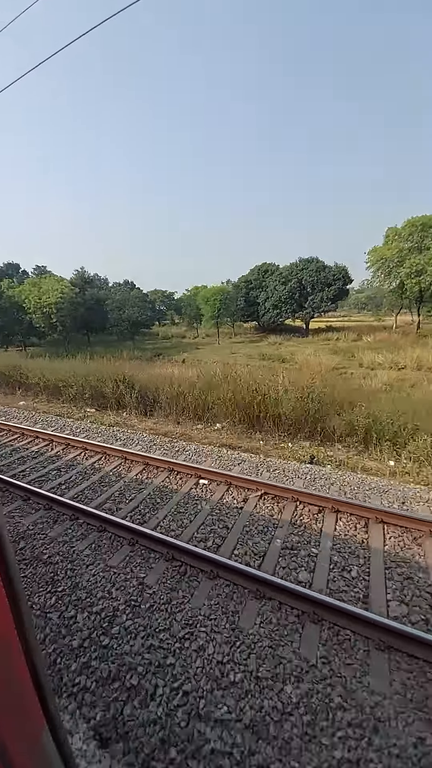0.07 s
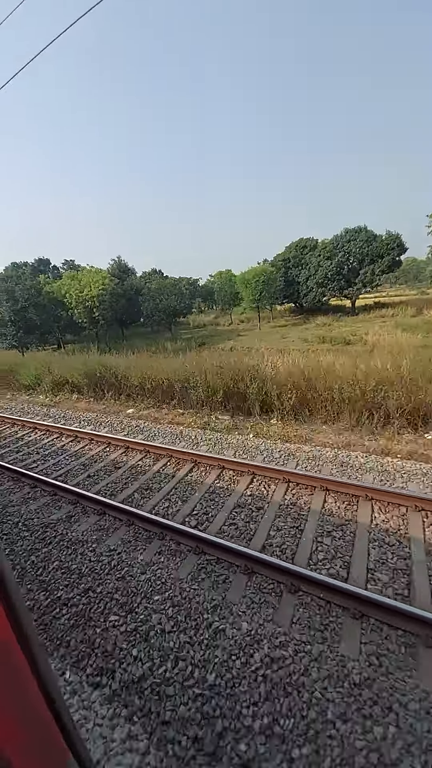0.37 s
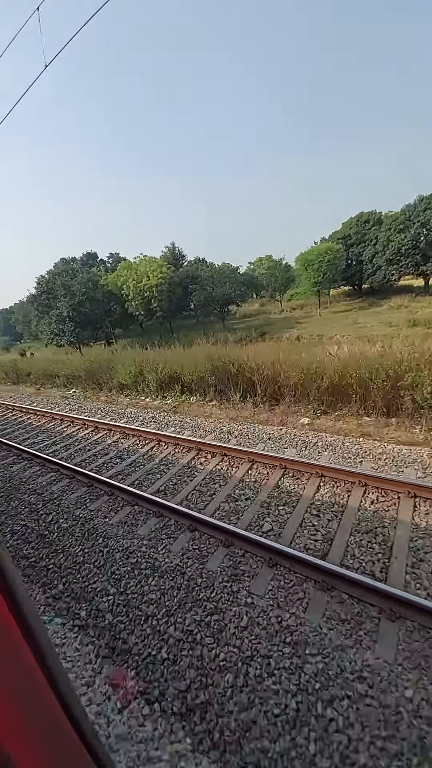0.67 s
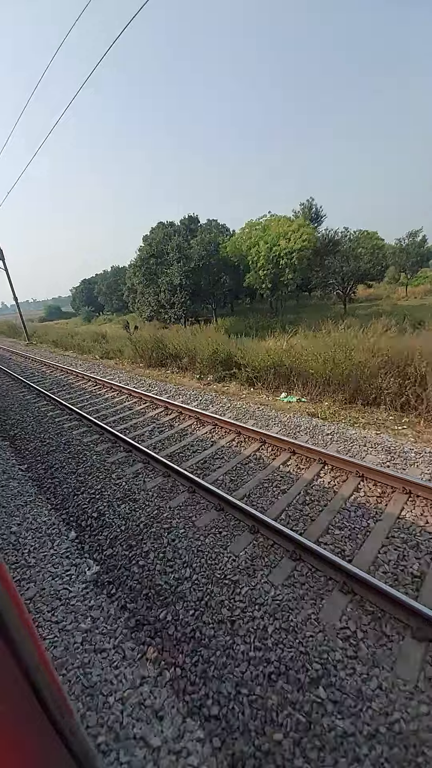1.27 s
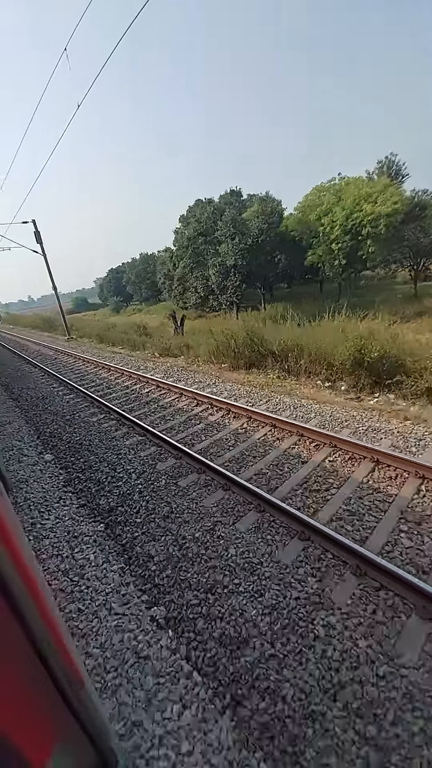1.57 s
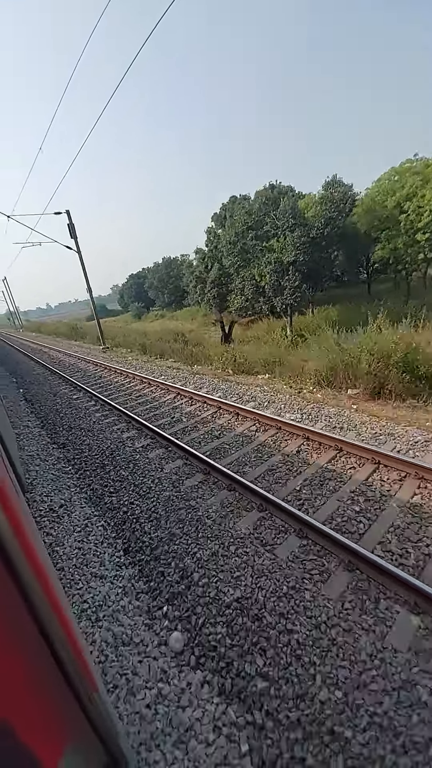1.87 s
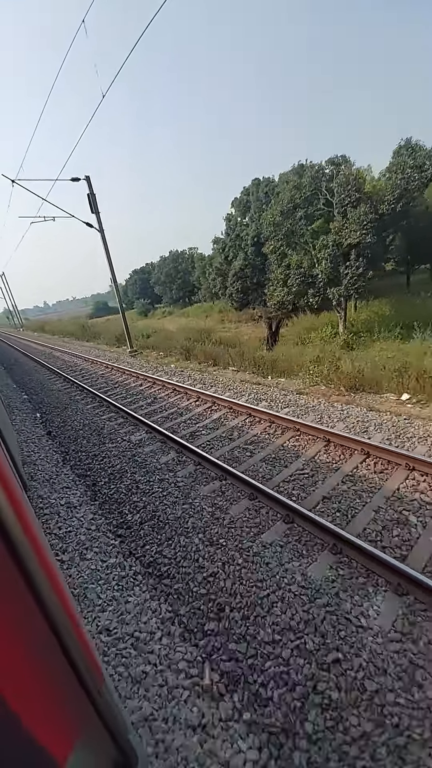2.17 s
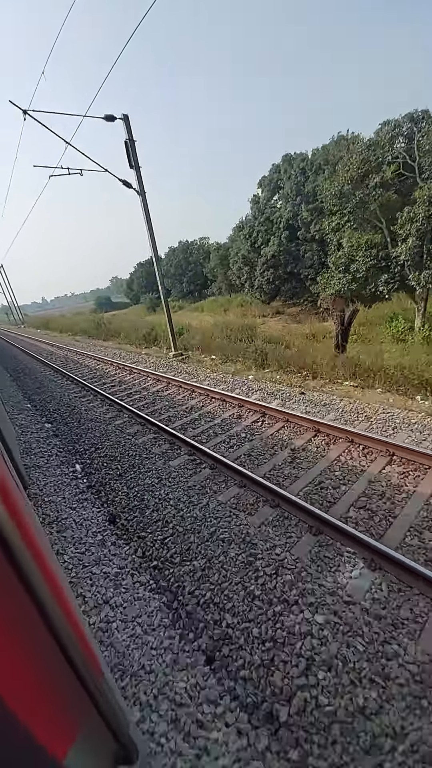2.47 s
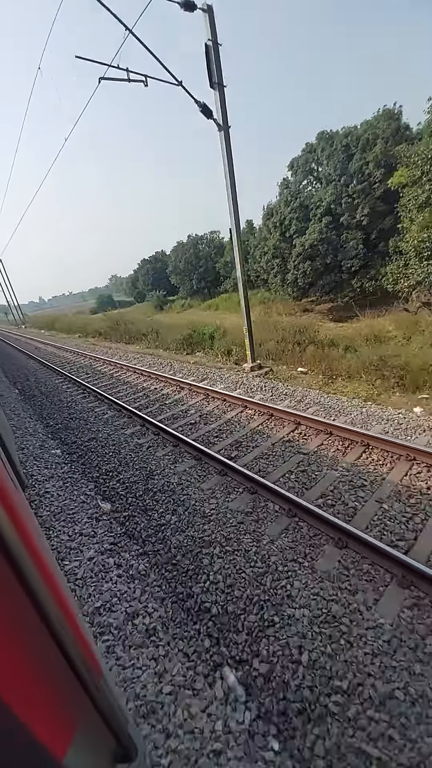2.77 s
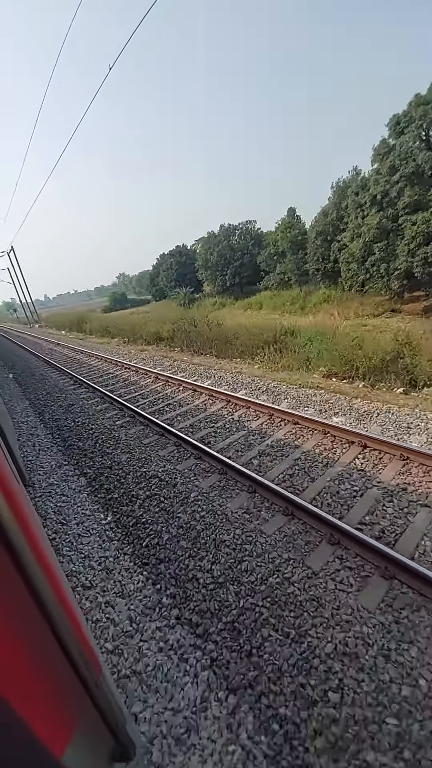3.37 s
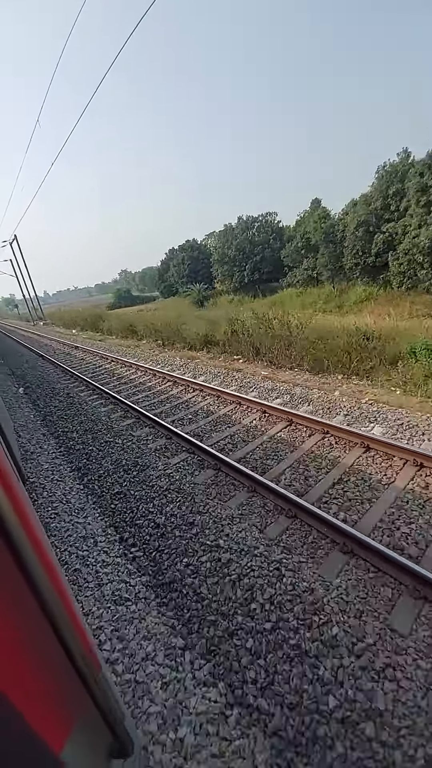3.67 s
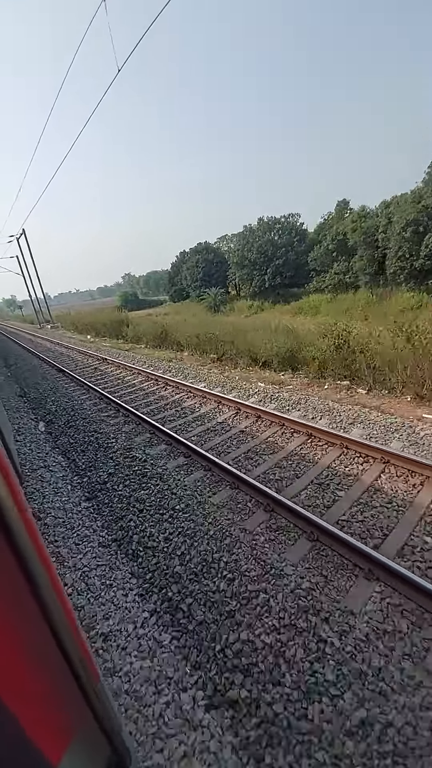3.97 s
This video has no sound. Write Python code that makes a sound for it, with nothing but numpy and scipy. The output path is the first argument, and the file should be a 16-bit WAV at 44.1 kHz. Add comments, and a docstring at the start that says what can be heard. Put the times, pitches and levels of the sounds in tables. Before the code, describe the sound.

Ragged gusts thump and crackle on the microphone as a train rolls along.

```python
"""Fast train from an open doorway

Wheels roll on the rails with a steady roar and faint ringing. The slipstream hits the two microphone
ports: a lumpy rumble, deep thumps, and a run of ragged buffets that grow brighter and crackle as the
microphone turns into the wind."""
import sys
import numpy as np
from scipy import signal
from scipy.io import wavfile
from scipy.ndimage import uniform_filter1d

SR = 44100
rng = np.random.default_rng(int(sys.argv[2]) if len(sys.argv) > 2 else 0)


def unload_wav(signal):
    """Save mono or channel-first audio to the path in sys.argv[1] as 16-bit WAV at rate SR, clipped to [-1, 1]."""
    wavfile.write(
        sys.argv[1],
        SR,
        np.round(np.clip(np.atleast_2d(signal).T, -1, 1) * 32767).astype(np.int16),
    )


N = 176400
T = np.arange(N) / SR

# how alike the low wind is on the two ports: t/s, correlation/0-1
LOW_WIND_LIKENESS = [(0, 0.84), (.75, 1), (.95, 0), (4, 0)]


def from_db(db):
    """Decibels to gain."""
    return 10 ** (np.asarray(db) / 20)


def rms_one(x):
    """Scale to unit power."""
    return x / np.sqrt(np.mean(x ** 2) + 1e-20)


def evened(x, samples):
    """Hold the power of a noise at 1 over a sliding window."""
    return x / np.sqrt(np.abs(uniform_filter1d(x ** 2, samples, axis=-1)) + 1e-20)


def in_time(rows):
    """Breakpoints to automation curves, one per column after the time."""
    times, *columns = np.transpose(rows)
    return np.array([np.interp(T, times, column) for column in columns])


def around(middle):
    """The samples near an event."""
    return slice(max(int((middle - .07) * SR), 0), min(int((middle + .11) * SR), N))


def panned(db):
    """Left and right gains at unit mean power; positive dB leans left."""
    return rms_one(from_db(np.array([[db], [-db]]) / 2))


def alike(pair, likeness):
    """Blend two unrelated noises into a left and right of the given correlation."""
    likeness = np.clip(likeness, 0, 1)
    mid = np.sqrt(1 + likeness) * pair[0]
    side = np.sqrt(1 - likeness) * pair[1]
    return np.vstack([mid + side, mid - side]) / np.sqrt(2)


def drift(hz):
    """Two unrelated smooth random modulators; rms 1."""
    step, settle = 20, 2000
    pole = np.exp(-2 * np.pi * hz * step / SR)
    white = rng.standard_normal((2, N // step + settle + 2))
    slow = signal.lfilter([1], [1, -2 * pole, pole * pole], white)[:, settle:]
    return np.array([np.interp(np.arange(N) / step, np.arange(len(v)), rms_one(v)) for v in slow])


def burst(t, middle, length):
    """Envelope with a quick attack, sagging hold and exponential release."""
    attack_s, release_s, sag_db = 0.002, 0.0062, 1.9
    early = np.maximum(middle - length / 2 + attack_s - t, 0)
    late = np.maximum(t - middle - length / 2 + release_s / 2, 0)
    sag = from_db(-sag_db * np.clip((t - middle) / length, -.5, .5))
    return sag * np.exp(-(early / attack_s) ** 2 - late / release_s)


def cut(x, hz, kind):
    """Gentle high-, low- or band-pass."""
    return signal.sosfilt(signal.butter(2, hz, kind, fs=SR, output="sos"), x)


def resonator(hz, q):
    """Coefficients of a resonant low-pass."""
    w = 2 * np.pi * hz / SR
    damping = np.sin(w) / (2 * q)
    return (1 - np.cos(w)) / 2 * np.array([1, 2, 1]), [1 + damping, -2 * np.cos(w), 1 - damping]


def hump(x, hz, q, low_share, top_share=4.16):
    """Gather air noise near one frequency, with band edges at multiples of it; rms 1."""
    x = signal.lfilter(*resonator(hz, q), cut(x, hz * low_share, "high"))
    return rms_one(cut(x, min(hz * top_share, SR / 3), "low"))


def banded_noise(spectrum):
    """Stereo noise coloured by a bank of band-passes; rms 1."""
    edges_hz = np.geomspace(18, 17000, 25)
    hz, db = np.transpose(spectrum)
    white, out = rng.standard_normal((2, 2, N)), 0
    for k, band in enumerate(zip(edges_hz, edges_hz[1:])):
        gain = from_db(np.interp(np.mean(np.log(band)), np.log(hz), db))
        out = out + gain * cut(white[k % 2], band, "band")
    return rms_one(out)


def ported(x):
    """The microphone ports ring hollowly and swallow one band."""
    # port peaks and dip: f/Hz, width/Hz, share added or taken away
    bands = [(864, 126, 0.37), (1410, 94, -0.52), (1680, 380, 0.22)]
    return x + sum(share * signal.lfilter(*signal.iirpeak(hz, hz / width_hz, fs=SR), x)
                   for hz, width_hz, share in bands)


def turbulence(flutter_db=4.5):
    """Raggedly fluttering pressure on each port, coloured by the port."""
    return ported(rng.standard_normal((2, N)) * from_db(flutter_db * drift(hz=134)))


def buffets(trim_db=1.5):
    """The slipstream hits in bursts of turbulence over a low body; faster air sounds brighter."""
    # slipstream hits: middle/s, length/s, relative level/dB, corner/Hz, pan/dB
    hits = [(0.08, 0.03, -28, 590, 3.5), (0.463, 0.026, -20, 470, -0.5), (0.497, 0.027, -21, 467, 0.5),
            (0.625, 0.024, -24, 460, -3), (0.69, 0.053, -26, 505, 1), (0.78, 0.04, -25, 463, -19),
            (0.98, 0.035, -25, 468, -1.5), (1.03, 0.031, -30, 513, -24), (1.113, 0.027, -20, 600, -9),
            (1.165, 0.0082, -20.5, 470, -13), (1.26, 0.049, -25, 507, -9), (1.37, 0.029, -30, 430, -3),
            (1.412, 0.0092, -31, 330, -4), (1.49, 0.03, -18.5, 550, 2), (1.541, 0.022, -25, 427, -1),
            (1.57, 0.034, -14.5, 540, 1), (1.671, 0.028, -22.5, 413, 0), (1.694, 0.031, -17, 520, -1),
            (1.875, 0.044, -16, 525, -0.5), (1.92, 0.044, -17.5, 496, -2.5), (1.995, 0.032, -17, 660, 0),
            (2.028, 0.015, -22, 540, -3), (2.076, 0.029, -17.5, 466, 9), (2.225, 0.038, -26.5, 644, -4),
            (2.265, 0.03, -19.5, 795, 3), (2.315, 0.008, -27, 690, -6), (2.355, 0.041, -23, 840, -3.5),
            (2.445, 0.04, -22.5, 960, -0.5), (2.534, 0.016, -22.5, 845, 0),
            (2.561, 0.0049, -11.5, 1030, 1.5), (2.601, 0.042, -20.5, 860, 0), (2.655, 0.045, -23, 740, -2),
            (2.72, 0.036, -20, 950, -0.5), (2.818, 0.009, -14.5, 970, 0), (2.864, 0.028, -19.5, 870, 0),
            (2.915, 0.036, -21.5, 780, -3), (2.994, 0.018, -17.5, 670, -1.5),
            (3.018, 0.018, -23.5, 780, -4), (3.086, 0.025, -17, 753, 0), (3.167, 0.016, -16, 664, -5),
            (3.193, 0.013, -23, 696, -4), (3.24, 0.016, -19, 795, -2), (3.318, 0.0091, -17.5, 1050, 7),
            (3.342, 0.027, -15.5, 930, -3), (3.37, 0.023, -19, 1090, 4), (3.42, 0.024, -18.5, 810, 6),
            (3.457, 0.028, -21, 980, 1.5), (3.497, 0.014, -21.5, 860, -1), (3.55, 0.064, -26, 814, -2),
            (3.597, 0.06, -22.5, 770, -2.5), (3.648, 0.036, -20, 814, 1.5), (3.682, 0.016, -17, 830, 1),
            (3.73, 0.013, -27.5, 844, -25), (3.795, 0.061, -23, 690, 2), (3.832, 0.025, -24, 664, -3),
            (3.885, 0.0086, -21, 850, -1), (3.92, 0.0063, -19, 720, 0), (3.96, 0.035, -25.5, 770, 0)]
    out, air = np.zeros((2, N)), [turbulence(), turbulence()]
    body = from_db(-7.5) * hump(turbulence(), hz=242.7, q=5.1, low_share=0.8)
    for k, (middle, length, db, hz, pan_db) in enumerate(hits):
        near = around(middle)
        edge_hz = min(1270 * (hz / 488) ** 2.56, SR / 3)   # slow air lacks treble
        flow = hump(air[k % 2][:, near], hz, q=1.11, low_share=0.5)
        puff = evened(cut(flow, edge_hz, "low") + body[:, near], samples=700)
        out[:, near] += from_db(db + trim_db) * panned(pan_db) * burst(T[near], middle, length) * puff
    return out


def cracks(trim_db=-6.5, decay_s=0.0033):
    """The sharpest eddies slap the ports and ring them: very short pops, some dull, some bright."""
    # slaps of air: t/s, relative level/dB, pan/dB, top edge/Hz
    slaps = [(0.455, -17, -14, 480), (1.568, -9.5, -6, 804), (1.693, -10, 3, 990), (1.855, -7, 0, 880),
             (1.905, -14, -1, 1000), (1.93, -14.5, 0, 1800), (2.001, -10.5, -12, 895),
             (2.067, -12, -18, 600), (2.339, -14, 11, 1600), (2.365, -13, 2, 1600), (2.434, -9.5, 11, 1800),
             (2.557, -12, 4, 2800), (2.588, -9.5, -2, 1700), (2.649, -20, 12, 3600),
             (2.708, -10.5, -4, 2400), (2.719, -10, 7, 2400), (2.818, -13, -1, 2570),
             (2.859, -11.5, 9, 2400), (2.987, -10, 5, 1100), (2.995, -17, 1, 1000), (3.091, -11, -8, 1100),
             (3.161, -11, -1, 1600), (3.23, -17, -9, 1100), (3.335, -20, -2, 2000), (3.369, -9, -9, 1800),
             (3.3925, -10.5, -3, 2380), (3.410, -20, 14, 5000), (3.42, -24.5, 4, 11000),
             (3.461, -14, -3, 1990), (3.598, -10, 7, 1400), (3.654, -14, 3, 2800), (3.679, -33, 0, 2400),
             (3.712, -18, -16, 1500), (3.963, -19, 16, 1530), (3.982, -14, -9, 1400)]
    out = np.zeros((2, N))
    soften = signal.butter(1, 854, fs=SR)
    for start, db, pan_db, top_hz in slaps:
        near = around(start)
        age = T[near] - start
        pop = ported(rng.standard_normal((2, len(age))) * (age > 0) * np.exp(-np.abs(age) / decay_s))
        pop = cut(signal.lfilter(*soften, pop), min(top_hz, SR / 3), "low")
        pop = cut(pop, 390, "high")
        strength = np.sqrt(np.sum(pop ** 2, axis=1, keepdims=True) / (.003 * SR))   # rms as if 3 ms long
        out[:, near] += from_db(db + trim_db) * panned(pan_db) * pop / strength
    return out


def thumps(trim_db=1.5, floor_hz=52):
    """Big slow eddies press on both ports at once with a deep thump."""
    # low blows of air: middle/s, length/s, relative level/dB, f/Hz
    blows = [(0.102,0.057,-26.5,141),(0.148,0.049,-27.5,105),(0.467,0.016,-17,114),(0.494,0.022,-17.5,117),(0.521,0.024,-22.5,262),(0.64,0.049,-26.5,111),(0.682,0.03,-20.5,250),(0.742,0.032,-30.5,73),(1.398,0.023,-28,110),(1.56,0.018,-29,146),(1.87,0.021,-14,122),(2.581,0.021,-20,122),(2.678,0.015,-23,224),(2.746,0.018,-16,254),(2.918,0.028,-27,119),(2.972,0.046,-37,129),(3.34,0.054,-22.5,222),(3.351,0.064,-27,84),(3.405,0.037,-28,122),(3.61,0.023,-23,127),(3.675,0.022,-19.5,227),(3.97,0.031,-25.5,127)]
    air = alike(rng.standard_normal((2, N)), in_time(LOW_WIND_LIKENESS))
    out = np.zeros((2, N))
    for middle, length, db, hz in blows:
        near = around(middle)
        boom = evened(hump(air[:, near], hz, q=4.4, low_share=0.66), samples=900)
        out[:, near] += from_db(db + trim_db) * burst(T[near], middle, length) * boom
    return cut(out, floor_hz, "high")


def rumble(trim_db=-1, swing_db=4):
    """Lumpy low wind, at first common to both ports, then separate."""
    # relative wind level on each port: t/s, left/dB, right/dB
    levels = [(0, -25, -37), (0.15, -32, -29.5), (0.3, -29, -30), (0.72, -27, -26), (0.85, -28.5, -62),
              (1.3, -26, -64), (1.5, -24, -44), (2.0, -22, -35), (2.16, -30.5, -33), (2.3, -21.5, -29),
              (2.9, -21, -24.5), (3.2, -21.5, -24.5), (3.4, -21, -20.5), (3.75, -21, -31.5), (4, -16, -20)]
    # colour of the low wind: f/Hz, level/dB
    colour = [(20, -17), (35, -18), (55, -5), (85, -6.5), (125, -1), (180, -13.5), (240, -4), (330, -10.5),
              (500, -17), (1500, -93), (16000, -103)]
    air = alike(banded_noise(colour), in_time(LOW_WIND_LIKENESS))
    lumps = from_db(swing_db * drift(hz=16))
    return from_db(in_time(levels) + trim_db) * rms_one(evened(air, samples=3000) * lumps)


def eddies(swing_db=3.6):
    """Small eddies churn between the buffets; their hollow hump glides up with the speed of the flow."""
    # bed of churning air: t/s, level/dB, corner/Hz
    churn = [(0, -37, 322), (.4, -54, 330), (.6, -25.5, 420), (.9, -29, 400), (1.2, -27.5, 430),
             (1.5, -23, 430), (2.05, -27, 484), (2.12, -34, 453), (2.18, -34, 524), (2.3, -28.5, 760),
             (2.78, -30.5, 860), (3.25, -28.5, 820), (3.38, -19.5, 860), (3.53, -29.5, 856),
             (4, -32.5, 820)]
    db, hz = in_time(churn)
    air, flow = turbulence(), 0
    corners = np.geomspace(hz.min(), hz.max(), num=8)
    for corner, selector in zip(corners, np.eye(len(corners))):
        crossfade = np.interp(hz, corners, selector)
        flow = flow + crossfade * hump(air, corner, q=2.4, low_share=0.74)
    flutter = from_db(swing_db * drift(hz=30))
    return from_db(db) * rms_one(evened(flow, samples=2200) * flutter)


def rolling(swing_db=1.3):
    """Wheels on rails: a low roar and a bright rasp, both wavering slightly."""
    # rolling noise: t/s, roar level/dB, rasp level/dB
    levels = [(0, -36, -34.5), (.12, -40.5, -34.5), (.3, -36, -34.5), (.7, -39, -37), (.85, -45, -39),
              (1.5, -31.5, -42), (1.6, -32.5, -45), (2.15, -32.5, -44), (2.5, -35, -42.5), (4, -41.5, -43)]
    # colours of the roar and the rasp: f/Hz, level/dB
    roar_colour = [(30, -25), (110, 0), (175, 1), (250, 10), (420, -2), (620, -0.5), (950, -5),
                   (1400, -13.5), (2500, -14), (16000, -65)]
    rasp_colour = [(30, -40), (1000, 7.5), (1400, -3), (1900, 4.5), (2600, 2), (3200, 0), (4400, -1),
                   (6300, -15.5), (8000, -17.5), (16000, -40)]
    roar_db, rasp_db = in_time(levels) + swing_db * drift(hz=12)
    return from_db(roar_db) * banded_noise(roar_colour) + from_db(rasp_db) * banded_noise(rasp_colour)


def track_rushes():
    """Brief bright rushes of noise from the track."""
    # rushes: middle/s, length/s, level/dB
    rushes = [(0.481, 0.06, -35.5), (0.686, 0.023, -29), (0.73, 0.062, -36.5), (1.117, 0.022, -29.5),
              (1.25, 0.067, -37), (3.338, 0.0087, -24.5)]
    # their colour: f/Hz, level/dB
    colour = [(30, -52), (1300, 5.5), (2200, 11.5), (2750, 11), (3600, -2), (5500, -1), (8000, -44),
              (16000, -43)]
    envelope = sum(from_db(db) * burst(T, middle, length) for middle, length, db in rushes)
    return envelope * banded_noise(colour)


def wheel_rings(flare_db=2.4):
    """Rail roughness keeps the wheels ringing; now and then the ring flares."""
    # wheel and rail resonances: f/Hz, width/Hz, relative level/dB
    modes = [(1774, 210, -3.5), (2331, 115, -1), (2563, 310, -3), (4000, 230, -12), (4400, 71, -9.5)]
    # how hard they ring: t/s, level/dB
    levels = [(0, -45.5), (.16, -38.5), (.28, -45.5), (.64, -45.5), (.685, -32.5), (.76, -43), (1.3, -48),
              (1.6, -51), (3.2, -52), (3.38, -55), (4, -46.5)]
    out = 0
    for hz, width_hz, db in modes:
        ring = cut(rng.standard_normal((2, N)), [hz - width_hz / 2, hz + width_hz / 2], "band")
        flare = from_db(flare_db * drift(hz=10)[0])
        out = out + from_db(db) * rms_one(ring * flare)
    return from_db(in_time(levels)) * out


def hiss(flicker_db=.5):
    """A faint, airy hiss flickers above the rolling noise."""
    # hiss envelope: t/s, level/dB
    levels = [(0, -53.5), (.13, -49.5), (.3, -54.5), (.44, -51), (.49, -44), (.55, -54.5), (1.35, -52),
              (1.41, -49), (1.46, -54.5), (1.55, -53), (1.58, -56.5), (2.5, -56.5), (4, -57)]
    # its colour: f/Hz, level/dB
    colour = [(30, -40), (3000, -22), (6000, 4.5), (8300, -9), (10300, 2.5), (12500, -1), (15500, -4.5)]
    return from_db(in_time(levels) + flicker_db * drift(hz=20)[0]) * banded_noise(colour)


def scene():
    """Wind on the microphone over the sound of the train."""
    wind = buffets() + cracks() + thumps() + rumble() + eddies()
    train = rolling() + track_rushes() + wheel_rings() + hiss()
    return wind + train


def record(dry, ceiling=1.3, cutoff_hz=15800):
    """Soft saturation rounds the peaks and a steep low-pass cuts the top."""
    rounded = ceiling * np.tanh(dry / ceiling)
    return signal.sosfilt(signal.ellip(12, .1, 80, cutoff_hz, fs=SR, output="sos"), rounded)


dry = scene()
out = record(dry)
unload_wav(out)
```